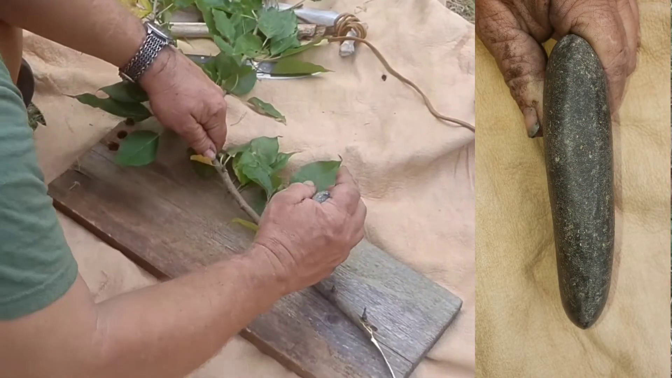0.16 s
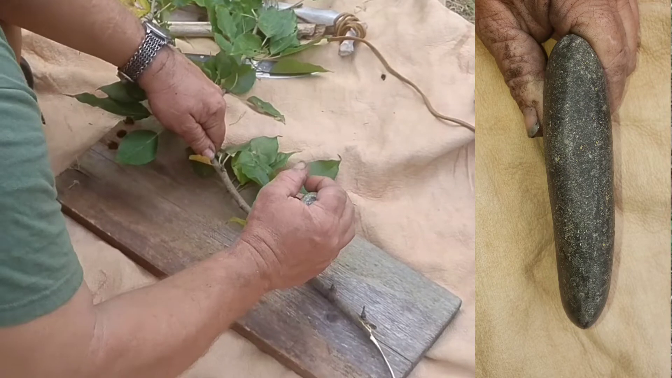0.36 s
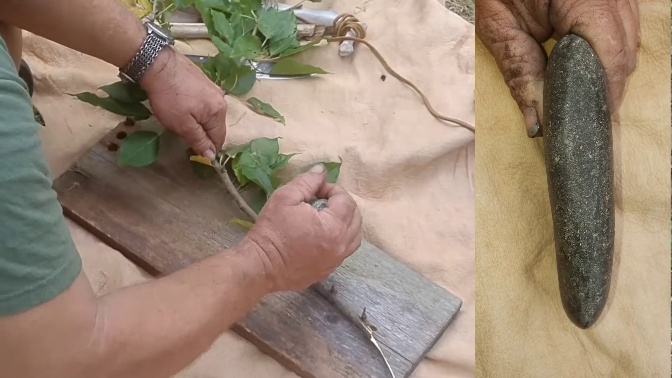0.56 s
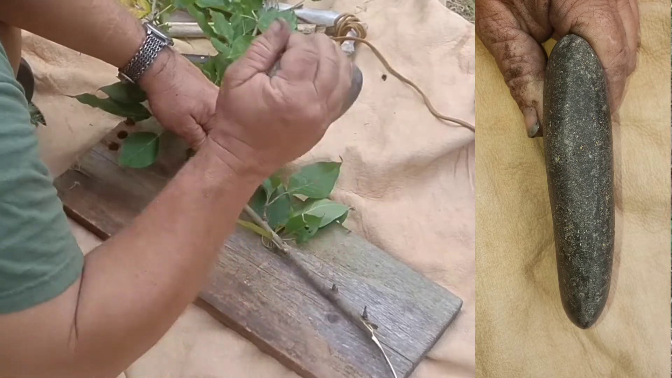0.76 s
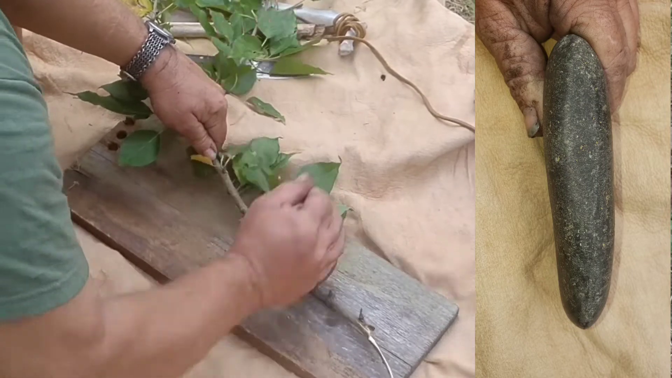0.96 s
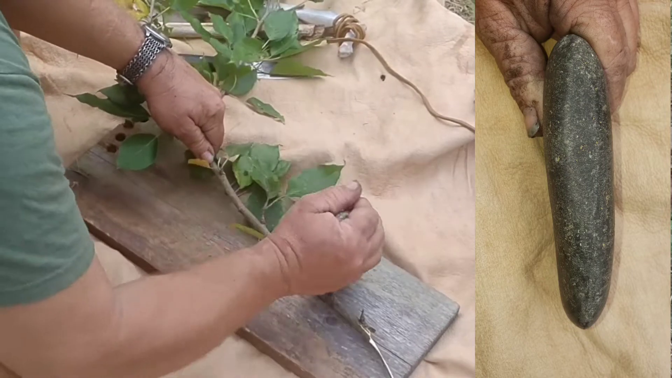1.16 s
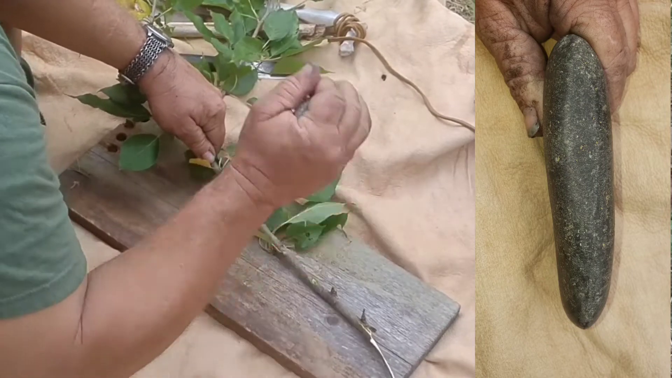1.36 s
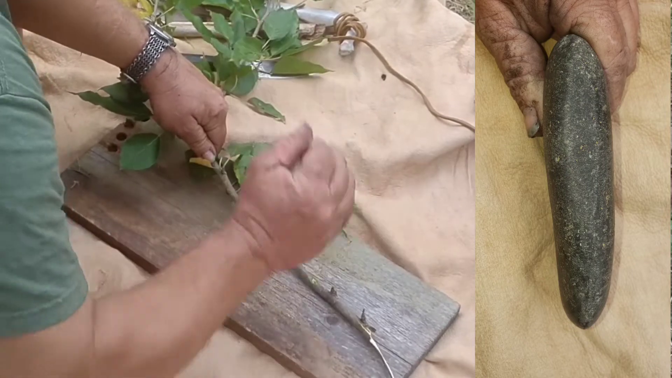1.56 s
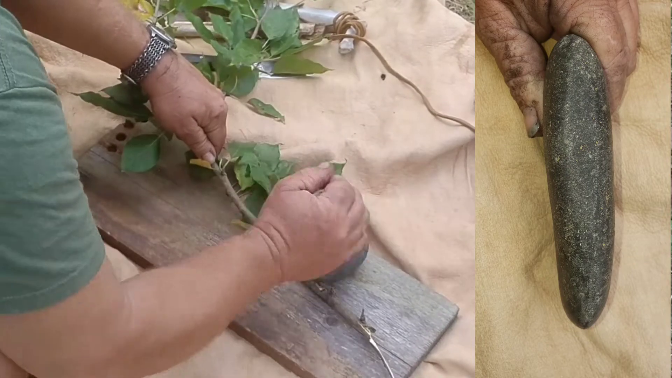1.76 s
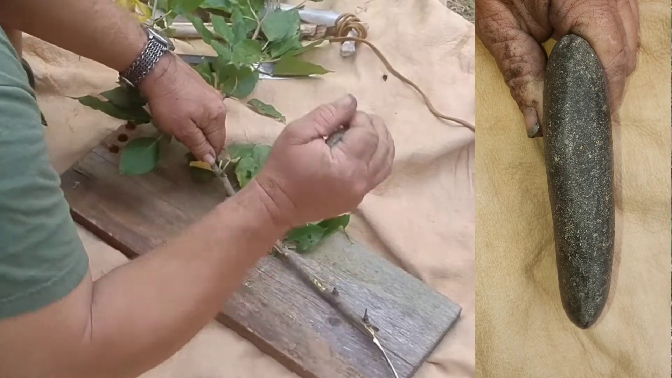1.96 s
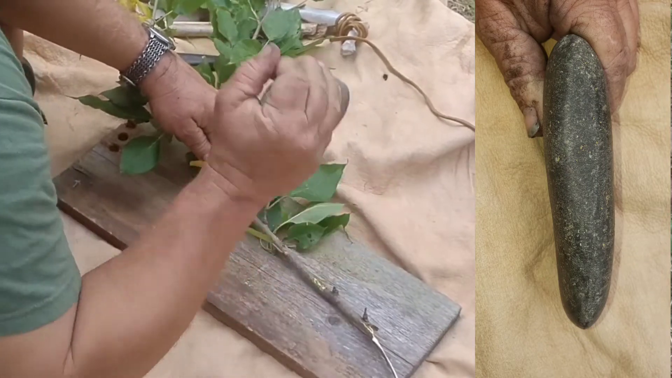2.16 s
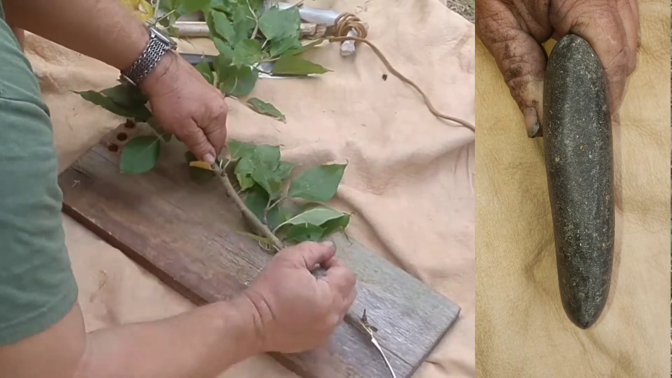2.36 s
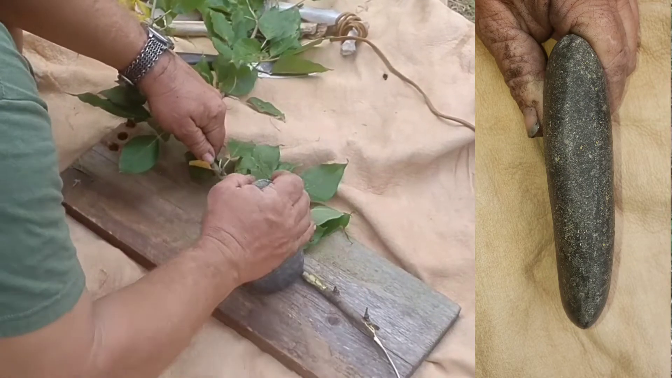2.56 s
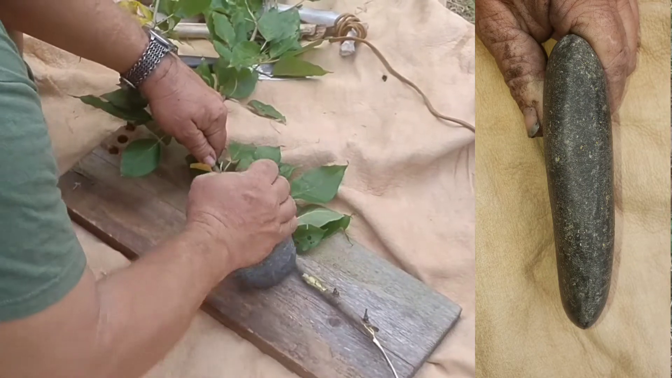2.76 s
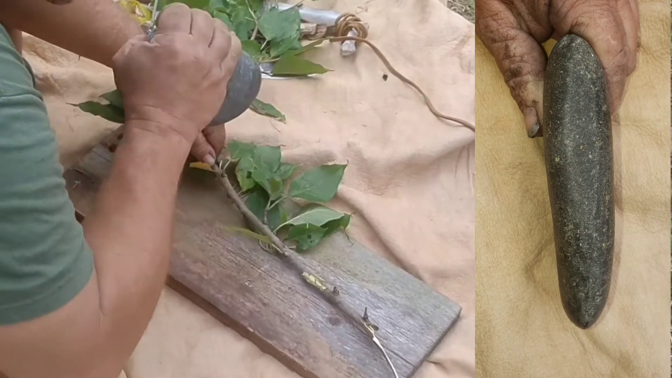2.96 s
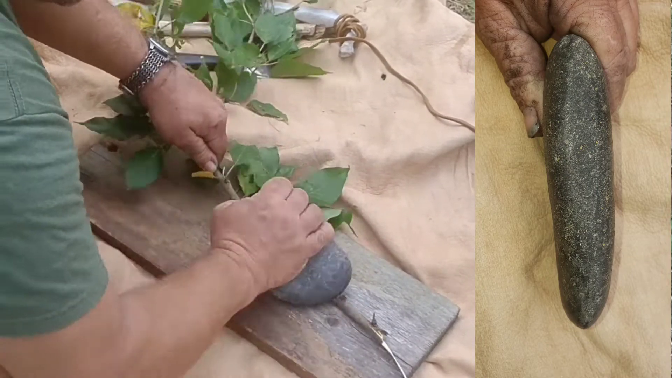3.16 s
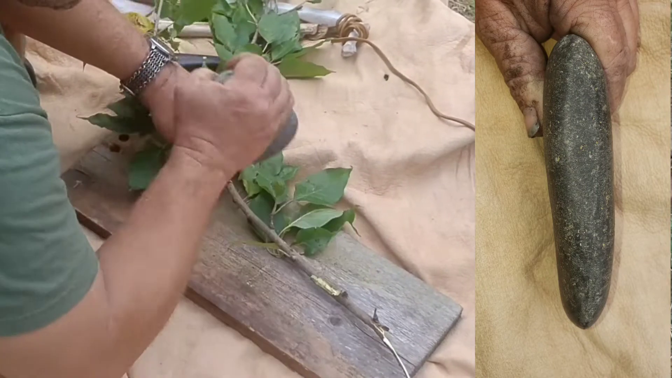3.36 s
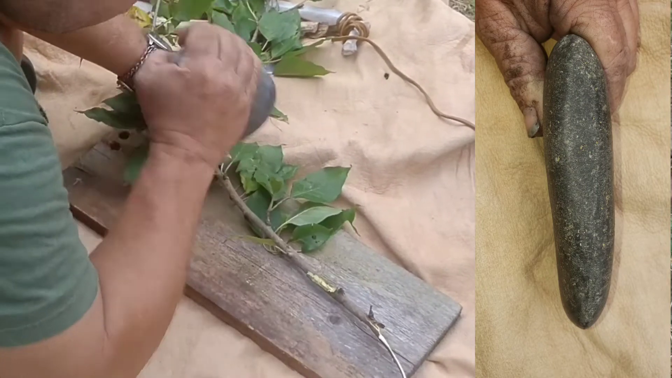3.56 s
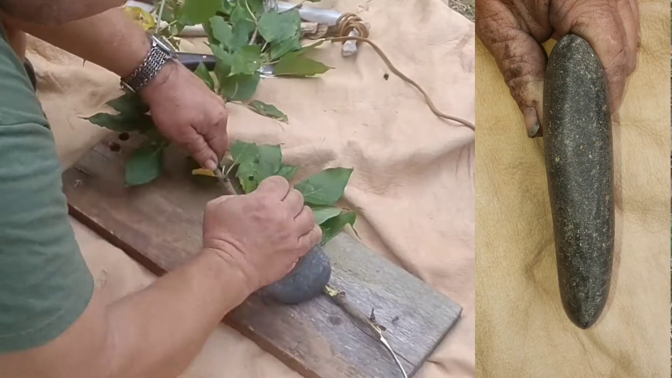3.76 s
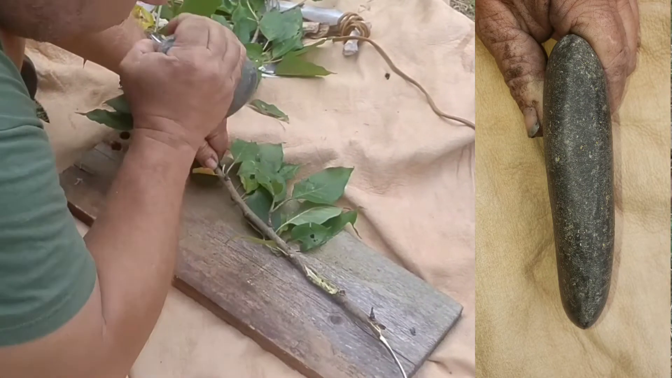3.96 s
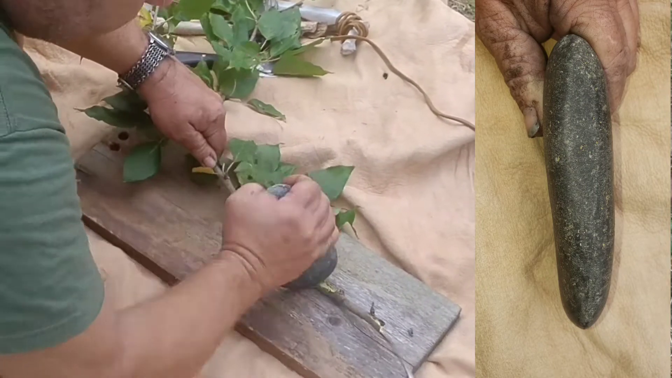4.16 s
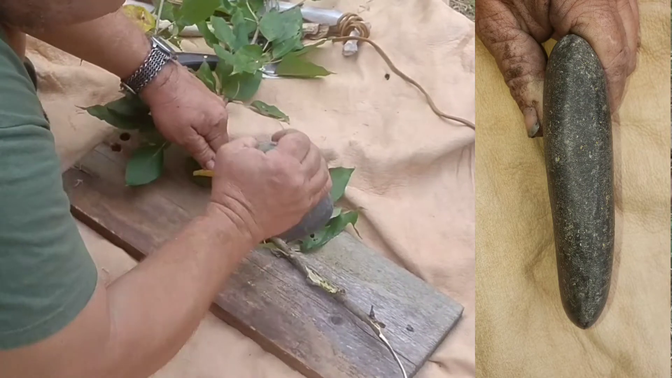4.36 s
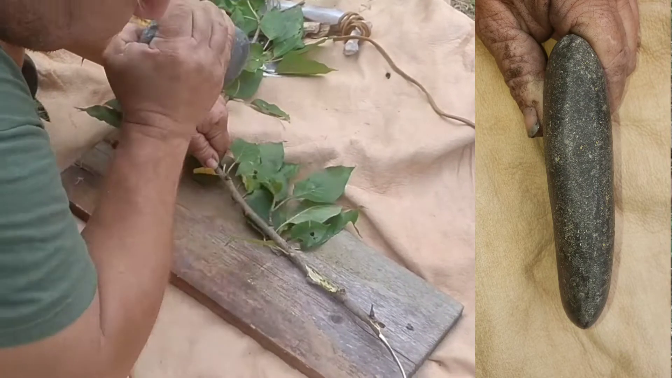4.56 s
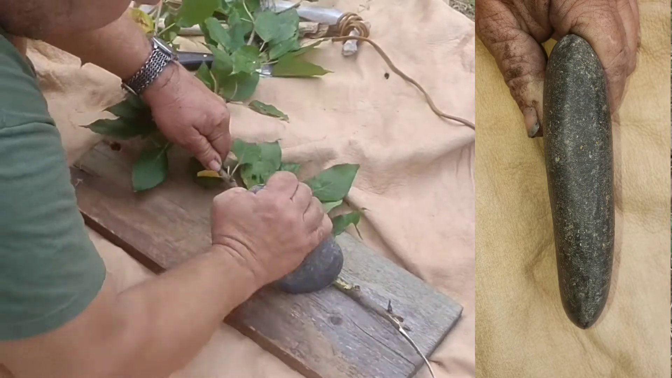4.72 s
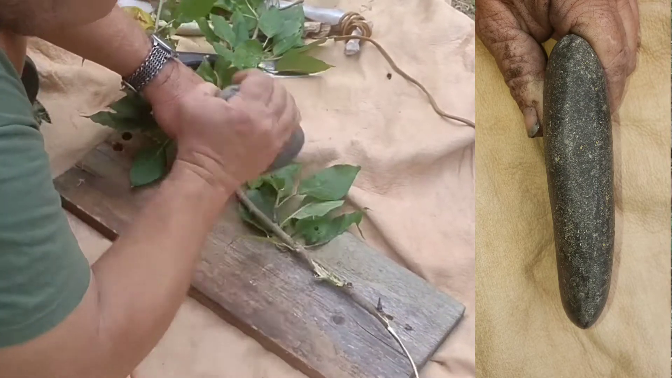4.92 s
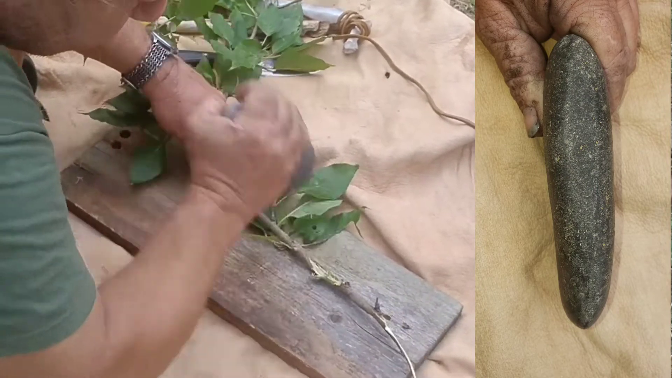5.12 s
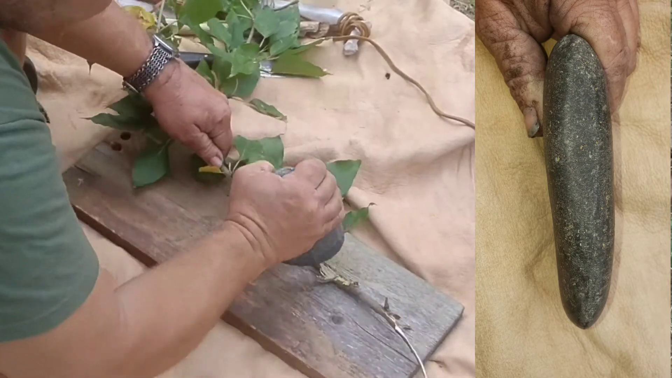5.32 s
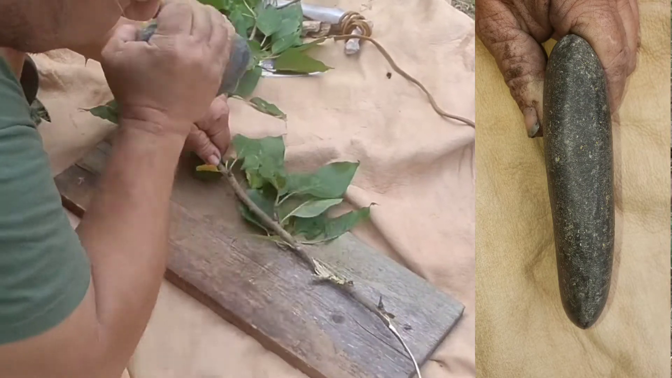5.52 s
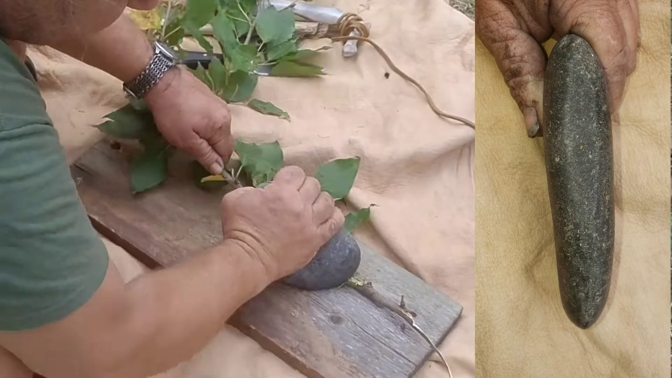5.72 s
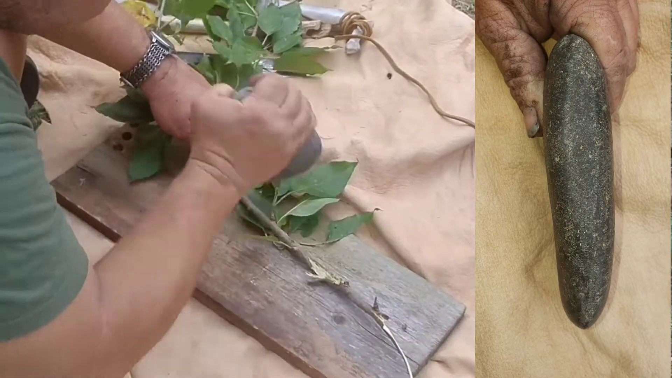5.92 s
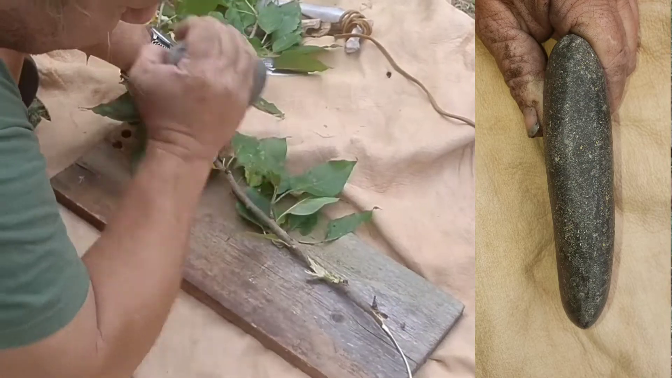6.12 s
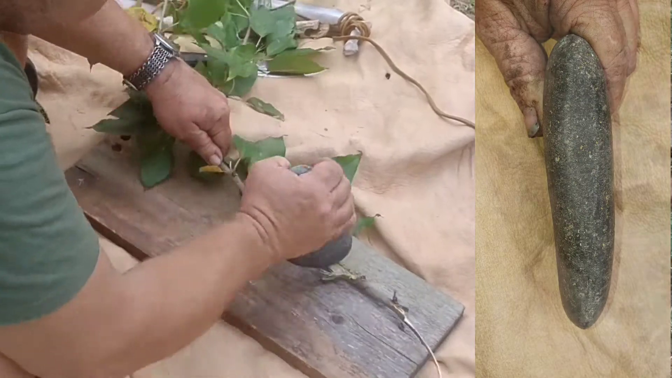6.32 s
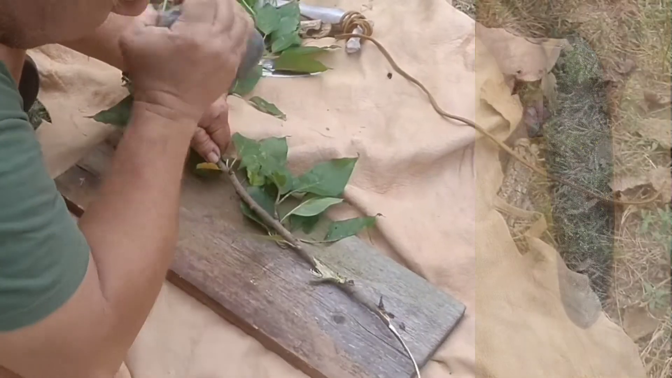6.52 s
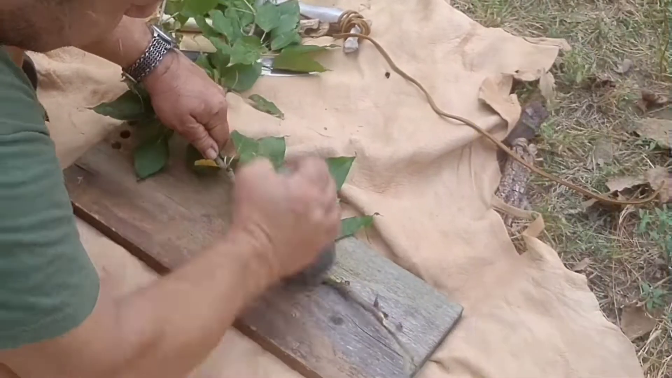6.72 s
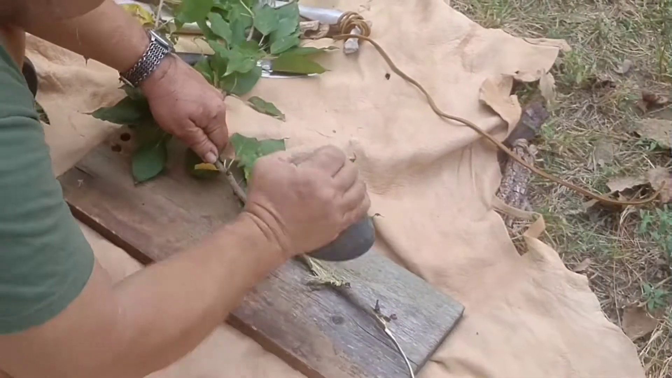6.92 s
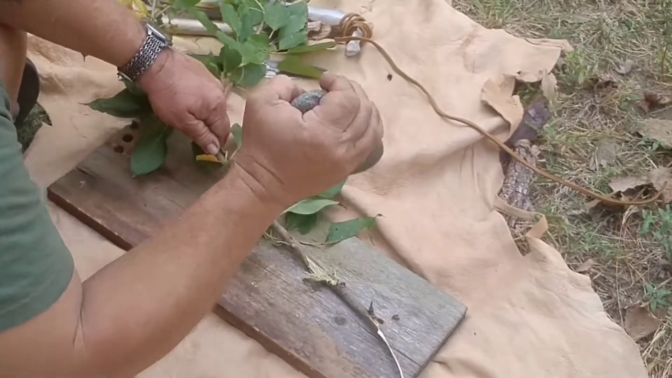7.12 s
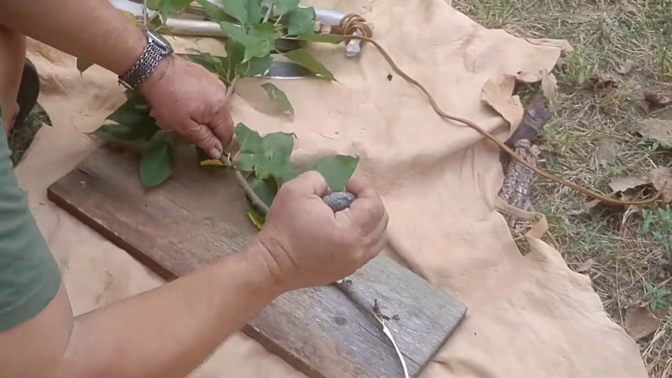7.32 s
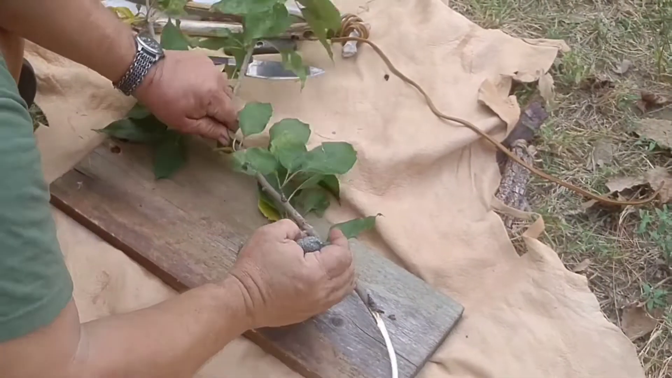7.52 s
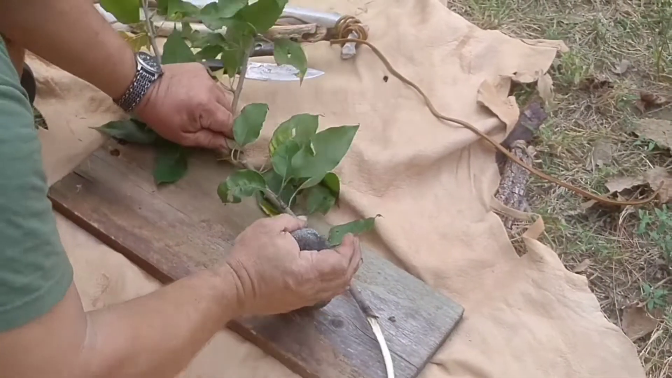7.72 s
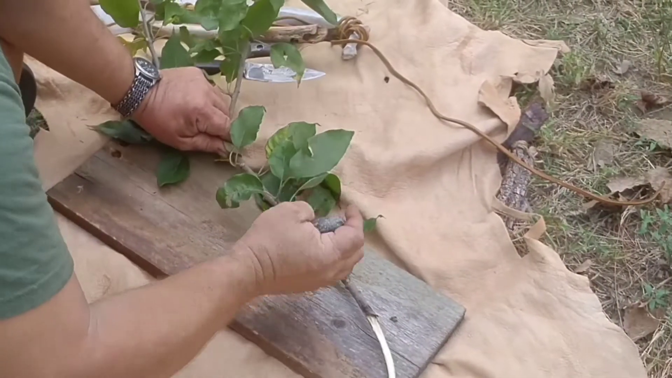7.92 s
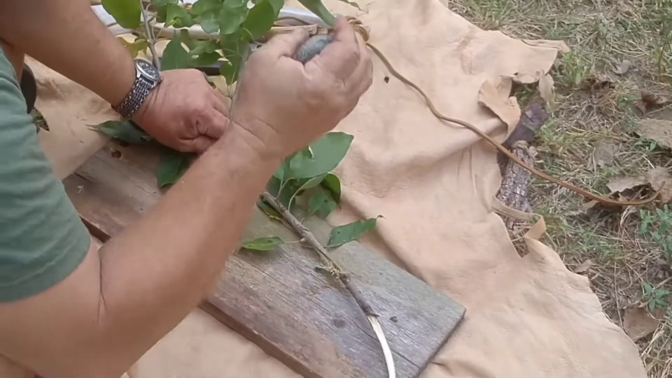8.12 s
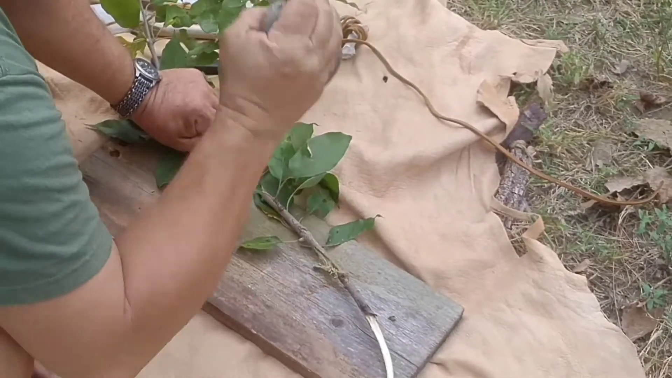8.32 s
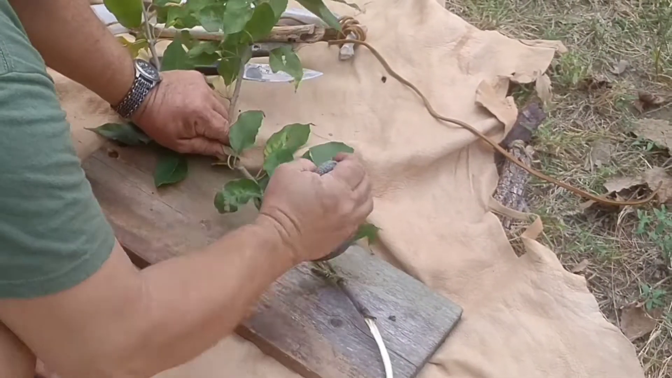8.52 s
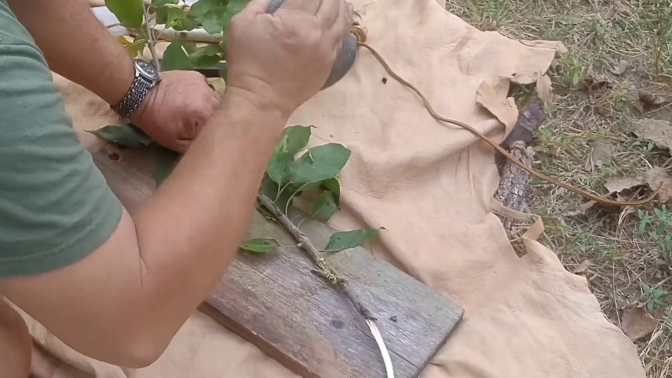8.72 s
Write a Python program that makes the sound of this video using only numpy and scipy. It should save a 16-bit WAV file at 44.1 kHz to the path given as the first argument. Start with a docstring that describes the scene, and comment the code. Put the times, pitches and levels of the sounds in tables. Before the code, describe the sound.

Close, dry chopping in an open yard: stone strikes green wood on a board, at first slightly unevenly, then steadily every half second, with a weaker knock and one final heavy blow after pauses. Fibres crack, the board knocks briefly, and a faint echo follows. High insect trills, fluttering buzzes and low wind rumble continue behind, dipping slightly after loud hits.

```python
"""Outdoors, a light wind bumps the microphone and insects buzz in the grass from start to end.
After a soft knock, a hand-held stone axe chops thirteen times through a green branch on a wooden board.
Each blow is a shove of air, ringing board modes that mostly die at once, and bursts of cracking fibres;
light knocks, rubs and small crackles come before, with and between the blows, and the yard echoes faintly.
A limiter holds the peaks, and the gain dips after loud blows and creeps back up."""
import sys
import numpy as np
from scipy import signal
from scipy.fft import rfft, irfft
from scipy.io import wavfile
from scipy.ndimage import uniform_filter1d, minimum_filter1d

SR = 44100
rng = np.random.default_rng(int(sys.argv[2]) if len(sys.argv) > 2 else 0)


def master_out(mix):
    """Clip the mix to full scale and print it as 16-bit PCM to the path in sys.argv[1]."""
    frames = np.transpose(np.atleast_2d(mix))
    ceiling = np.clip(frames, -1, 1)
    pcm = np.round(ceiling * 32767).astype(np.int16)
    wavfile.write(sys.argv[1], SR, pcm)


N = 391608
TIME = np.arange(N) / SR
RING = np.arange(SR // 4) / SR  # time axis of one short sound, s


def amp(db):
    """Turns decibels into a gain."""
    return 10 ** (np.asarray(db) / 20)


def unit(x):
    """Scales a sound to an rms of 1."""
    return x / np.sqrt(np.mean(x ** 2) + 1e-20)


def read(points, hz):
    """Reads a table between its rows, on a log-frequency axis."""
    f, value = np.transpose(points)
    return np.interp(np.log(hz + 1), np.log(f + 1), value)


def level(curve):
    """Gain over time from rows of time_s, level_db."""
    return amp(np.interp(TIME, *np.transpose(curve)))


def add(mix, s, sound):
    """Mixes a sound in at time s."""
    part = mix[max(round(s * SR), 0):][:len(sound)]
    part += sound[:len(part)]


def band(x, order, hz, kind):
    """Keeps the low, the high or a middle band of frequencies."""
    return signal.sosfilt(signal.butter(order, hz, kind, fs=SR, output="sos"), x)


def noise(spectrum):
    """Steady noise of rms 1, shaped by rows of pitch_hz, relative level_db."""
    bins = rfft(rng.standard_normal(N))
    shape = amp(read(spectrum, np.fft.rfftfreq(N, 1 / SR)))
    return unit(irfft(bins * shape, N))


def drift(hz):
    """Random wandering of rms 1, no faster than about hz."""
    bins = rfft(rng.standard_normal(N))
    smooth = np.exp(-(np.fft.rfftfreq(N, 1 / SR) / hz) ** 2)
    return unit(irfft(bins * smooth, N))


def resonate(x, hz, width_hz):
    """One resonance of gain 1: a wider one dies sooner."""
    r = np.exp(-np.pi * width_hz / SR)
    return 2 * signal.lfilter([1 - r], [1, -r * np.exp(2j * np.pi * hz / SR)], x).real


# spectrum of still air and far foliage: pitch_hz, relative level_db (per Hz)
AIR_SPECTRUM = [(30, 0.5), (60, 13.5), (130, -9), (300, -2.5), (800, -5.5), (1400, -7), (2100, -12.5),
                (3200, -13), (5000, -17.5), (7000, -20.5), (10000, -22.5), (15400, -27), (15900, -51)]
# level of the still air, before air_db lifts it: time_s, level_db
AIR_CURVE = [(0, -56.5), (1, -58), (2.2, -60.5), (4.1, -58), (5, -60), (8.3, -56), (8.88, -60)]


def still_air(air_db=4.5):
    """Still air and far foliage: shaped noise whose level wavers a little."""
    return noise(AIR_SPECTRUM) * level(AIR_CURVE) * amp(air_db + .5 * drift(4.9))


# spectrum of wind rumble on the microphone: pitch_hz, relative level_db (per Hz)
RUMBLE_SPECTRUM = [(20, -26), (32, -7), (50, 5), (70, 6), (100, -5.5), (150, -44), (220, -32), (320, -46.5),
                   (600, -65)]
# strength of the breeze, before random gusts: time_s, level_db
BREEZE_CURVE = [(0, -49), (.3, -35.5), (.8, -37), (1.0, -39.5), (1.5, -48), (2.1, -50.5), (2.6, -33),
                (2.95, -46), (3.3, -42), (4.3, -45.5), (4.9, -47.5), (5.2, -45), (6.05, -47), (6.35, -42.5),
                (6.75, -46.5), (7.15, -39.5), (7.95, -39.5), (8.2, -52.5), (8.45, -40.5), (8.88, -46.5)]
# single puffs that bump the microphone, on top of the breeze: time_s, rumble_db, eddies_db
WIND_PUFFS = [(.1, 7, 18.5), (.3, 5.5, 17), (.72, 2.5, 4), (.82, 6.5, 9), (1.35, 9.5, 12.5), (2.71, 7, -2),
              (3.06, 12, 2), (3.28, 9, 13.5), (4.13, 10, 27), (5.57, 10, 2.5), (7.08, 5, 13),
              (7.33, 5, 5.5), (7.44, 2, 7), (7.85, 1, 13), (8.0, 11, 16)]
PUFF_S = 0.053


def wind(gust_db=1.3, gust_hz=8, eddy_db=-47, eddy_at_db=-37, eddy_growth=1.61, lump_db=4.5):
    """Rumble follows the gusting breeze; lumpy eddies above it grow faster than the rumble."""
    breeze = np.interp(TIME, *np.transpose(BREEZE_CURVE)) + gust_db * drift(gust_hz)
    rumble_db = breeze
    swirl_db = eddy_db + eddy_growth * (breeze - eddy_at_db)
    for s, low_db, high_db in WIND_PUFFS:
        puff = np.exp(-((TIME - s) / PUFF_S) ** 2)
        rumble_db = rumble_db + low_db * puff
        swirl_db = swirl_db + high_db * puff
    flow = noise(RUMBLE_SPECTRUM)
    # even out the noise's own swells, so that the breeze sets the level
    flow = flow / np.sqrt(uniform_filter1d(flow ** 2, size=3000) + 0.097)
    eddies = noise([(50, -26.5), (110, 6.5), (160, -3.5), (220, -13.5), (320, -26.5), (700, -59.0)])
    eddies = eddies * amp(lump_db * drift(14))
    return amp(rumble_db) * flow + amp(swirl_db) * eddies


def phrases(rows, length_s, swell_db, start_s=0.17, stop_s=0.03):
    """Insect phrases swell, level off and stop short: their gain, and slack effort from 1 down to 0."""
    gain, slack = np.zeros(N), np.zeros(N)
    for end, db in rows:
        left = (end - TIME) / length_s  # share of the phrase still to come
        gate = np.clip(length_s * np.minimum(left / stop_s, (1 - left) / start_s), 0, 1)
        lag = (gate > 0) * np.clip(left, 0, 1) ** 2
        gain += gate * amp(db - swell_db * lag)
        slack = np.maximum(slack, lag)
    return gain, slack


PHRASE_CLIMB_HZ = 300  # rise in pitch over a phrase


def trill(rate, top_hz, fall_hz, slack=0, jitter_hz=55):
    """Each wing stroke draws a scraper over a file; the tone swells, fades and falls within it."""
    stroke = np.cumsum(rate * (1 + 0.036 * drift(1.7))) / SR % 1
    hz = top_hz - PHRASE_CLIMB_HZ * slack - fall_hz * stroke + jitter_hz * drift(400)
    tone = np.sin(2 * np.pi * np.cumsum(hz) / SR)
    pulses = abs(np.sin(np.pi * stroke)) ** 2.4
    return unit(pulses * amp(1.5 * drift(21)) * tone)


# phrases of the lower trilling insect, before trill_db: end_s, level_db
LOW_PHRASES = [(1.29, -66), (3.1, -66), (4.9, -66.5), (6.83, -67.5), (8.65, -63.5)]
# phrases of the higher trilling insect, before trill_db: end_s, level_db
HIGH_PHRASES = [(.86, -73), (2.35, -69.5), (4.06, -70), (5.65, -71.5), (7.3, -68.5), (8.58, -67)]
PHRASE_S, PHRASE_SWELL_DB = 1.3, 5


def trillers(trill_db=-1, far_low_db=-71, far_high_db=-74):
    """Two near insects sing phrase after phrase over the steady trill of farther ones."""
    low, low_slack = phrases(LOW_PHRASES, PHRASE_S, PHRASE_SWELL_DB)
    high, high_slack = phrases(HIGH_PHRASES, PHRASE_S, PHRASE_SWELL_DB)
    near = low * trill(30.3, 7730, 300, low_slack) + high * trill(31.5, 8330, 310, high_slack)
    far_low = amp(far_low_db) * trill(25, 7850, 750, jitter_hz=129)
    far_high = amp(far_high_db) * trill(32.5, 8300, 600, jitter_hz=148)
    return amp(trill_db) * near + far_low + far_high


def strokes(rate, depth, waver=.012):
    """Rapid wing strokes make a rasp flutter: a gain of rms 1."""
    turns = np.cumsum(rate * (1 + waver * drift(3))) / SR
    return unit(1 + depth * np.cos(2 * np.pi * turns))


# buzzes of a katydid, before buzz_db: end_s, level_db
KATYDID_BUZZES = [(.47, -59.5), (5.18, -59), (8.761, -58)]
BUZZ_S, BUZZ_SWELL_DB, BUZZ_RATE = 2.5, 26.5, 130  # rate: wing strokes per second
# after each buzz it rests, then ticks for a while
TICK_REST_S, TICK_RUN_S, TICK_GAP_S, TICK_DB = .24, 0.79, .097, -61.5


def katydid(buzz_db=-2):
    """Wing strokes make a high rasp flutter in a swelling buzz, then the rasp comes in short ticks."""
    ticks = np.zeros(N)
    for end, _ in KATYDID_BUZZES:
        for s in end + TICK_REST_S + np.arange(0, TICK_RUN_S, TICK_GAP_S):
            uneven_s = 0.0025 * rng.standard_normal()
            add(ticks, s + uneven_s, amp(TICK_DB) * np.exp(-RING / 0.0049))
    rasp = noise([(7000, -30.5), (10000, -9), (11200, -7.0), (12400, -1.0), (13500, -7.5),
                  (15400, -9.5), (15900, -55)])
    buzz, _ = phrases(KATYDID_BUZZES, BUZZ_S, BUZZ_SWELL_DB)
    return rasp * (amp(buzz_db) * buzz * strokes(BUZZ_RATE, depth=0.53) + ticks)


# hisses of a farther insect, before hiss_db: end_s, level_db
FAR_HISSES = [(.3, -67), (3.1, -61.5), (4.14, -60), (8.1, -60.5), (9.0, -62)]
HISS_S, HISS_SWELL_DB, HISS_RATE = 1.28, 11.5, 104  # rate: wing strokes per second


def far_hisser(hiss_db=-2):
    """A farther insect's wing strokes make a high hiss flutter."""
    rasp = noise([(5000, -42.5), (8000, -9.5), (9700, -5.5), (11500, -6.5), (13500, -14.0), (15900, -25)])
    hiss, _ = phrases(FAR_HISSES, HISS_S, HISS_SWELL_DB, stop_s=0.16)
    return amp(hiss_db) * hiss * rasp * strokes(HISS_RATE, depth=0.61)


# ring of the yard: pitch_hz, t60_s (time to fall by 60 dB)
YARD_RING = [(100, 0.63), (250, 0.15), (500, 0.22), (1000, 0.24), (3000, 0.4), (8000, 0.15), (15000, .07)]


def yard(x, near_db=-21, near_s=0.012, far_db=-28, grass_hz=900):
    """Quick scatter from the body and ground, then a faint outdoor tail that fades at its own rate by pitch."""
    t = np.arange(SR // 2) / SR
    near, far = rng.standard_normal((2, len(t)))
    near = near * np.exp(-t / near_s) * (t > .004)
    near = near / np.linalg.norm(near)
    hz, at, z = signal.stft(far, SR, nperseg=256)
    fade = amp(-60 * at / read(YARD_RING, hz)[:, None])
    far = signal.istft(z * fade, SR, nperseg=256)[1][:len(t)] * np.minimum(t / 0.019, 1)
    # bring the tail's mean gain below 1000 Hz to 1
    lows = rfft(far)[np.fft.rfftfreq(len(t), 1 / SR) < 1000]
    far = far / np.sqrt(np.mean(abs(lows) ** 2))
    # the grass swallows the treble
    echo = band(amp(near_db) * near + amp(far_db) * far, 1, grass_hz, "low")
    return signal.fftconvolve(x, echo)[:N]


def mode(hz, db, t60, rise_cycles=1.65):
    """A bending mode: the soft green wood passes the force on over a few cycles."""
    rise = 1 - np.exp(-RING * hz / rise_cycles)
    return amp(db - 60 * RING / t60) * np.sin(2 * np.pi * hz * RING) * rise


def snaps(decay_s, linger_db=-27, linger_s=0.0097, spread_db=4):
    """A burst of breaking fibres of uneven size, with a few stragglers."""
    sizes = rng.standard_normal(len(RING)) * amp(spread_db * rng.standard_normal(len(RING)))
    return sizes * (np.exp(-(RING / decay_s) ** 2) + amp(linger_db) * np.exp(-RING / linger_s))


def burst(x, db, size=300):
    """Sets a short sound's energy to that of size samples (about 7 ms) at the level db."""
    return amp(db) * x / np.sqrt(np.sum(x ** 2) / size)


# resonances of the branch under the stone edge, before each crack retunes them: pitch_hz, width_hz, level_db
BRANCH_RINGS = [(1380, 800, -0.5), (2000, 300, 7), (2600, 230, 10.5), (3500, 317, 6.5), (4230, 470, 2.5),
                (5680, 460, -0.5), (7220, 700, -12.5)]
MAIN_RING = 2  # row of the branch's main ring


def crack(db, decay_s, tilt_db=0, bite_db=-40, ring_hz=2618, ring_db=0):
    """Snapping fibres ring the branch, whose pitch depends on where it is pinned."""
    force = snaps(decay_s, linger_db=-26.5, linger_s=.009)
    force = force / np.linalg.norm(force)
    force[0] += amp(bite_db)  # one sharp bite into the bark
    tuning = ring_hz / BRANCH_RINGS[MAIN_RING][0]
    wood = 0
    for k, (hz, width_hz, row_db) in enumerate(BRANCH_RINGS):
        gain_db = row_db + tilt_db * np.log2(hz / 3000) + ring_db * (k == MAIN_RING)
        # neighbouring resonances swing in opposite directions
        wood = wood + (-1) ** k * amp(gain_db) * resonate(force, hz * tuning, width_hz)
    return burst(band(wood, 2, [1000, 8000], "band"), db)


def fizz(db, decay_s, low_hz=6800, soft_hz=6000):
    """Bark and grit crushed under the edge: the treble of many tiny snaps, softened at the top."""
    grit = band(snaps(decay_s, linger_db=-13.5), 3, low_hz, "high")
    return burst(band(grit, 1, soft_hz, "low"), db)


# soft knocks and rubs as stone or branch shifts on the board:
# start_s, knock_db, pitch_hz, rub_db, rub_length_s
SHIFTS = [(0.469, -31, 426, -31, 0.015), (1.794, -25, 350, -36, 0.0094), (2.35, -13.5, 382, -24.5, 0.0093),
          (5.387, -50, 420, -49.5, 0.043), (5.905, -46, 413, -41, .026), (6.424, -51, 460, -50, 0.042),
          (6.822, -28, 427, -30, 0.03), (6.867, -50, 455, -45.5, 0.026), (6.904, -60, 400, -45.5, 0.049)]
# small crackles and twig ticks before, with, after and between the blows:
# start_s, level_db, decay_s, main_ring_hz
SMALL_CRACKLES = [(0.472, -47, 0.0046, 1270), (1.056, -32.5, .0028, 3000), (1.838, -55, 0.0011, 2740),
                  (2.302, -33, 0.0017, 2600), (3.184, -31.5, .0027, 2730), (4.823, -61, 0.0026, 2650),
                  (5.756, -43, 0.022, 2650), (6.808, -43, .008, 3070), (6.812, -32, 0.0016, 3170),
                  (7.601, -55.5, .0036, 3420), (8.479, -26.5, .005, 2300), (8.493, -44, 0.018, 2870),
                  (8.508, -47, 0.0032, 3660)]


def small_sounds(t60=0.031, upper_ratio=1.4, upper_db=-5, rub_width_hz=330):
    """Light two-pitch knocks, dull rubs of resonant noise and small crackles around the blows."""
    out = np.zeros(N)
    for s, db, hz, rub_db, length_s in SHIFTS:
        rub = rng.standard_normal(len(RING))
        for _ in range(2):
            rub = resonate(rub, hz, rub_width_hz)
        stroke = np.sin(np.pi * np.minimum(RING / length_s, 1))
        knock = mode(hz, db, t60) - mode(hz * upper_ratio, db + upper_db, t60)
        add(out, s, knock + amp(rub_db) * stroke * unit(rub))
    for s, db, decay_s, ring_hz in SMALL_CRACKLES:
        add(out, s, crack(db, decay_s, ring_hz=ring_hz) + fizz(db - 14.5, decay_s))
    return out


# modes of the board on the ground, before each blow's thump or clack: pitch_hz, level_db, t60_s
BOARD_MODES = [(69.8, -30.5, 0.26), (137, 2, 0.028), (222.5, -3.5, 0.026), (573, 10, 0.01), (749, 1, 0.012),
               (992, -3.5, .017), (1144, -3.95, 0.014)]
# one row a blow; crack_db is before split_db, tilt is in dB per octave:
# start_s, thump_db, lower_knock_hz, lower_knock_db, upper_knock_hz, upper_knock_db, clack_db,
# crack_db, crack_tilt_db, fizz_db, main_ring_hz, main_ring_extra_db
AXE_BLOWS = [(1.048, 6.5, 408.6, 10, 597, 7, 3.5, -10.5, -4.5, -31, 2490, -2.5),
             (1.6787, 11, 420, -3, 537, 3.5, 6.5, -17, -3.5, -37, 2650, 2),
             (2.2951, 10, 359, -3.5, 461, 5.5, -5, -14.5, 4, -38.5, 2610, 2.5),
             (3.175, 9, 365, -1, 508, 5, -3, -17.5, -6, -42, 2710, 9.5),
             (3.709, 12.5, 361, -3.5, 444, 2.5, 3.5, -12, -7, -28.5, 2700, -8.5),
             (4.2217, 9, 353, 0, 514, 4, 2, -15, -1, -44, 2550, -4),
             (4.7278, 8.5, 344, -1, 485, 7.5, 6, -15.5, 3, -31.5, 2670, -3),
             (5.2372, 10.5, 356, 1.5, 470, 9, 2, -25, -3, -43.5, 2570, -12),
             (5.747, 9, 380, -3.5, 506, 8.5, 0.5, -20, -1.5, -48, 2630, -2),
             (6.28, 9.5, 357, 0.5, 521, 10.5, 3, -23, -2.5, -46, 2590, -8.5),
             (6.7965, 10.5, 362, 3, 514, 10.5, 7.5, -9, -3, -37.5, 2620, -8),
             (7.536, -3, 416, 10.5, 609, 8.5, -5.5, -46.5, -5, -62, 2670, -8),
             (8.479, 10.5, 367, 2, 485, 8.5, 4.5, -25.5, -15, -48, 2400, 1)]


def chops(crack_s=0.0022, split_db=1, lead_s=0.001036, lower_t60=0.034, upper_t60=0.027,
          judder_db=-20, judder_s=0.01, push_db=-4, push_s=0.0007, lead_in_s=0.0025, lead_in_db=-24):
    """The edge loads the board and splits the branch; the knock's two pitches depend on where it lands."""
    out = np.zeros(N)
    # the first shove of air: one swing out and one back
    u = RING / push_s
    push = amp(push_db) * u * (2 - u) * np.exp(1 - u)
    for (s, thump, lower_hz, lower, upper_hz, upper, clack,
         split, tilt, grit, ring_hz, ring) in AXE_BLOWS:
        board = 0
        for k, (hz, db, t60) in enumerate(BOARD_MODES):
            # neighbouring modes swing in opposite directions; the low ones follow the weight of the blow
            blow_db = thump if hz < 400 else clack
            board = board + (-1) ** k * mode(hz, db + blow_db, t60)
        knock = mode(upper_hz, upper, upper_t60) - mode(lower_hz, lower, lower_t60)
        # the branch judders against the board as the blow dies away
        judder = band(snaps(judder_s, linger_db=-14.5, linger_s=0.017), 2, [280, 1100], "band")
        # a faint crackle leads into each blow
        add(out, s - lead_in_s, crack(split + lead_in_db, 0.006, 3.0))
        add(out, s - lead_s, board + knock + burst(judder, judder_db))
        fibres = crack(split + split_db, crack_s, tilt, bite_db=1.5, ring_hz=ring_hz, ring_db=ring)
        add(out, s, push + fibres + fizz(grit, decay_s=0.0031))
    return out


def scene():
    """The work on the board, in its yard, with the air, wind and insects around it."""
    wood = chops() + small_sounds()
    insects = trillers() + katydid() + far_hisser()
    return (wood + yard(wood) + still_air() + wind() + insects)[None]


def gain_control(x, threshold_db=-14, share=0.13, attack_s=0.073, recover_db_per_s=9):
    """Loud blows turn the gain down a little, and the background creeps back up."""
    over_db = share * np.maximum(20 * np.log10(abs(x[0]) + 1e-9) - threshold_db, 0)
    # hold the highest cut so far, letting it fall at a steady rate
    fall = TIME * recover_db_per_s
    cut_db = np.maximum.accumulate(over_db + fall) - fall
    r = np.exp(-1 / (attack_s * SR))
    return x * amp(-signal.lfilter([1 - r], [1, -r], cut_db))


EDGE_HZ = 16200  # top of the sound's band


def record(dry):
    """Slow gain control, a fast limiter that holds the blows at full scale, then the band limit."""
    ducked = gain_control(dry)
    gain = minimum_filter1d(1 / np.maximum(abs(ducked), 1), size=101)
    held = ducked * uniform_filter1d(gain, size=101)
    lowpass = signal.firwin(511, EDGE_HZ, window=("kaiser", 9), fs=SR)
    return signal.oaconvolve(held, lowpass[None], "same")


dry = scene()
out = record(dry)
master_out(out)
```